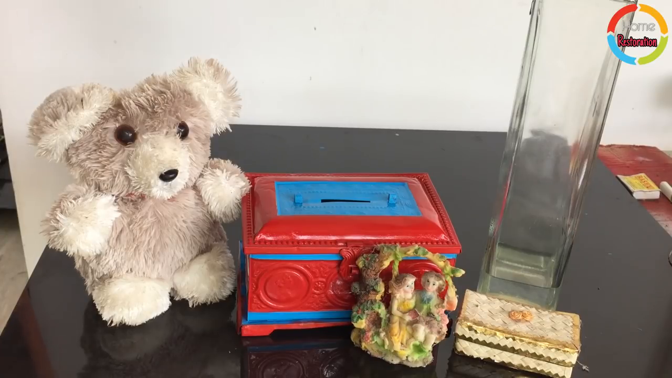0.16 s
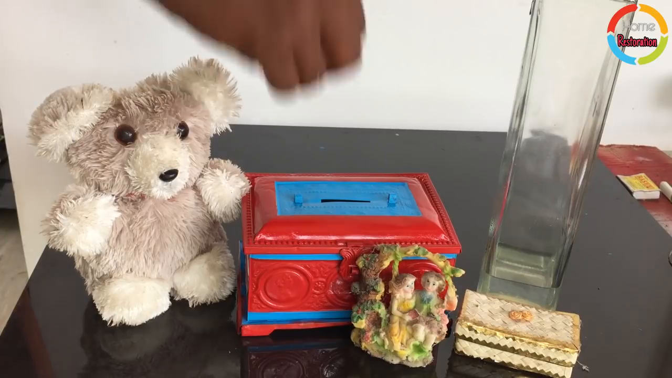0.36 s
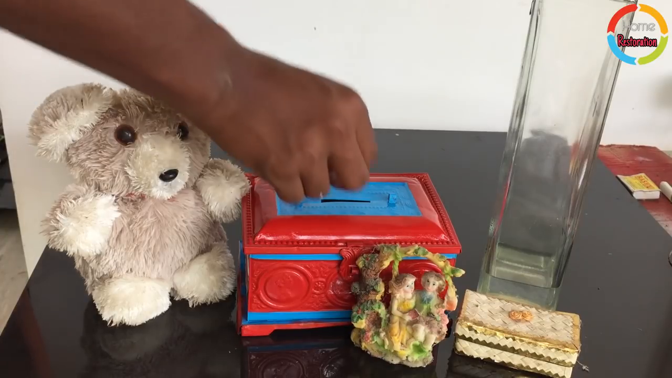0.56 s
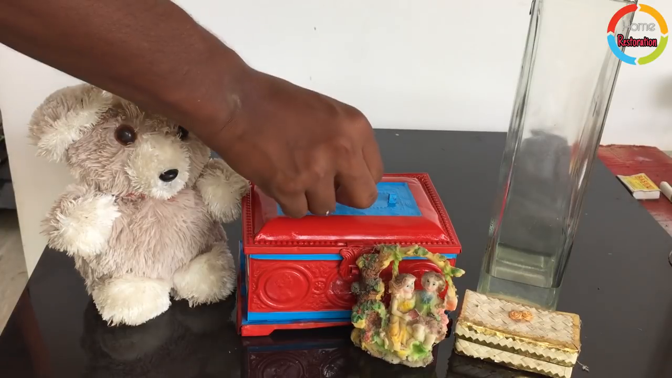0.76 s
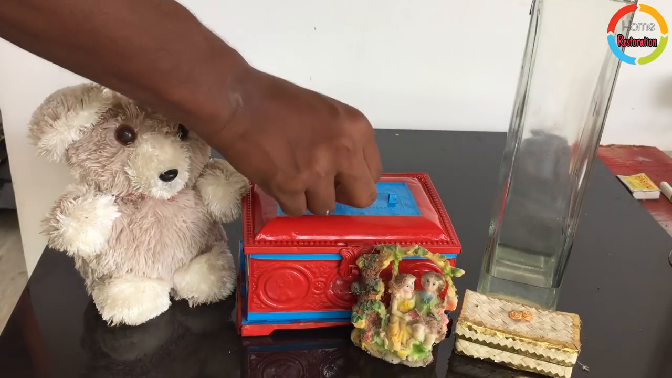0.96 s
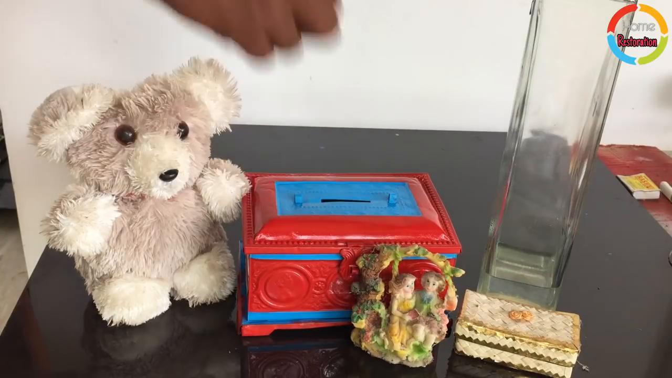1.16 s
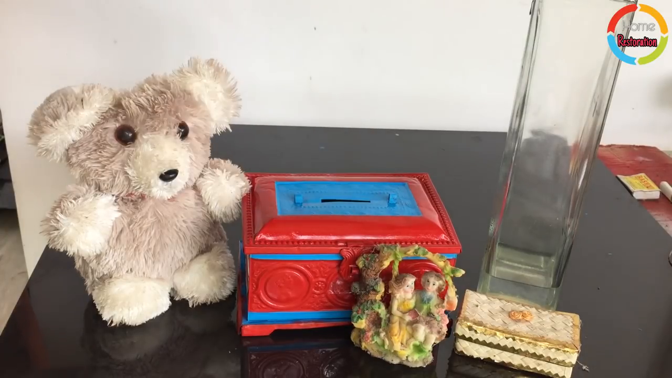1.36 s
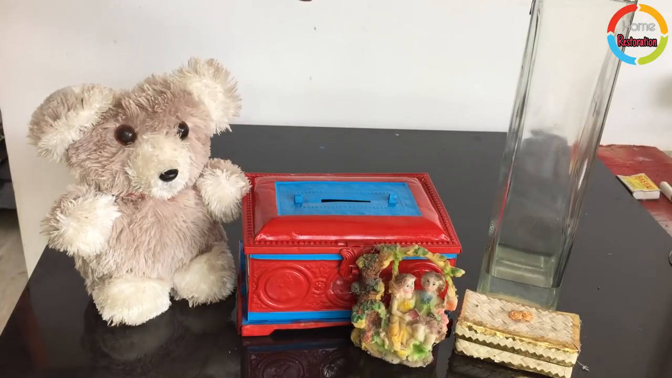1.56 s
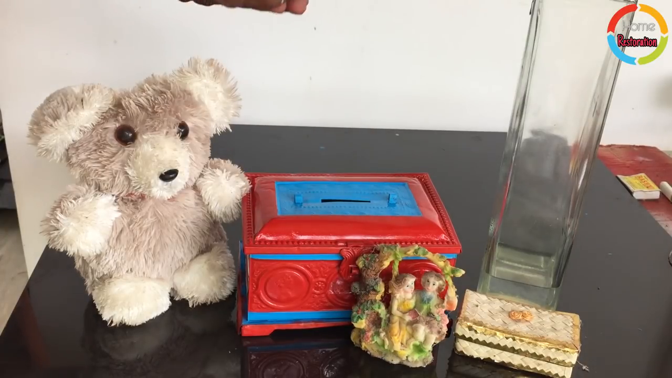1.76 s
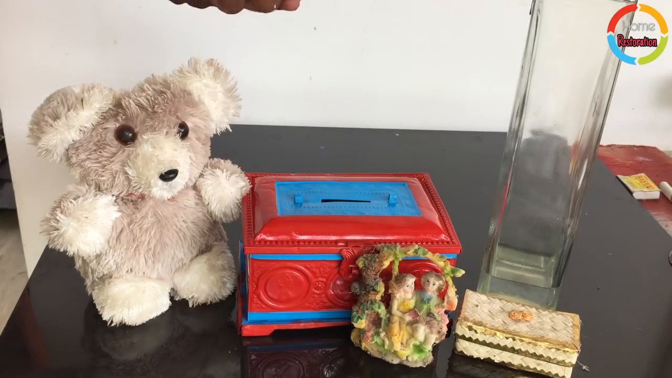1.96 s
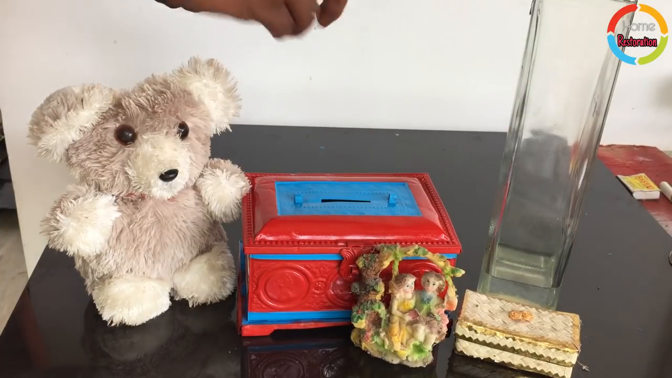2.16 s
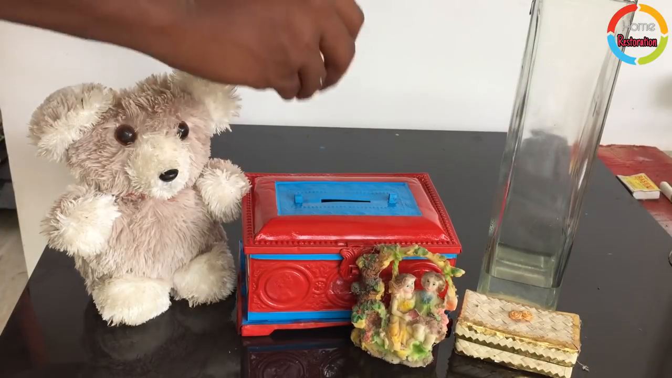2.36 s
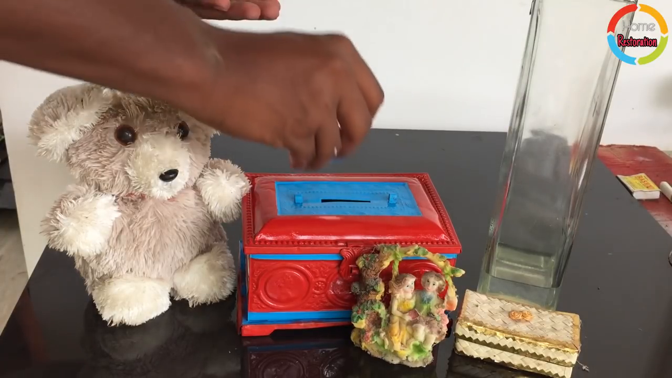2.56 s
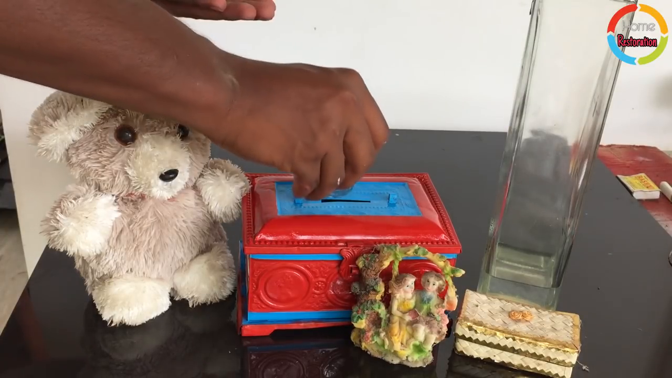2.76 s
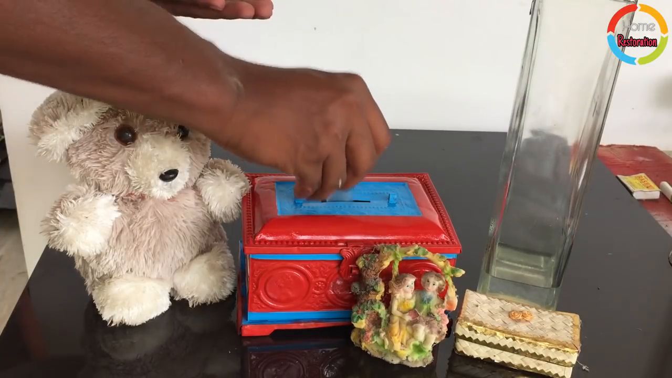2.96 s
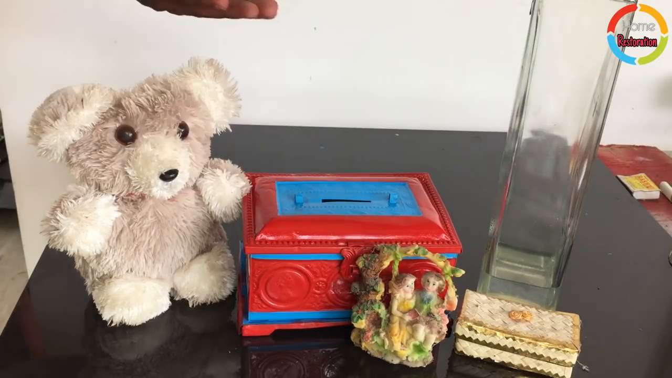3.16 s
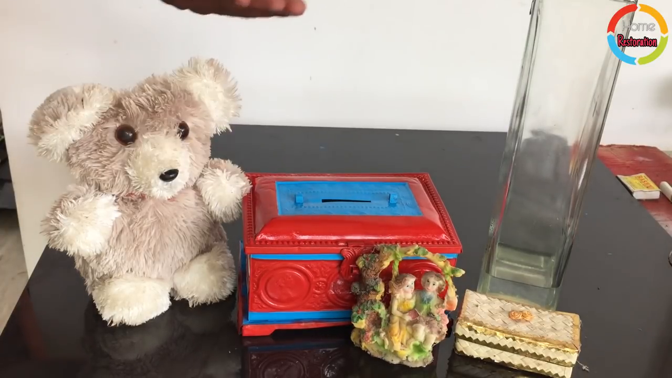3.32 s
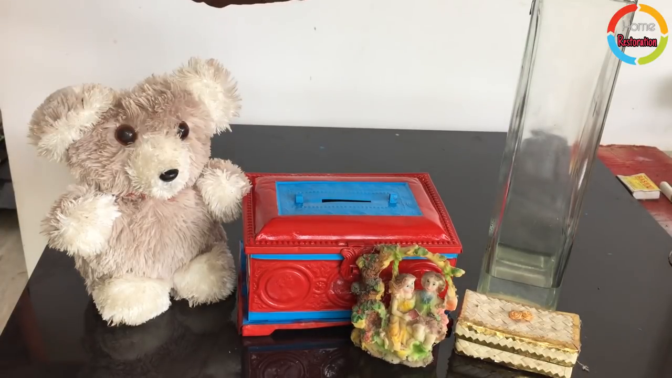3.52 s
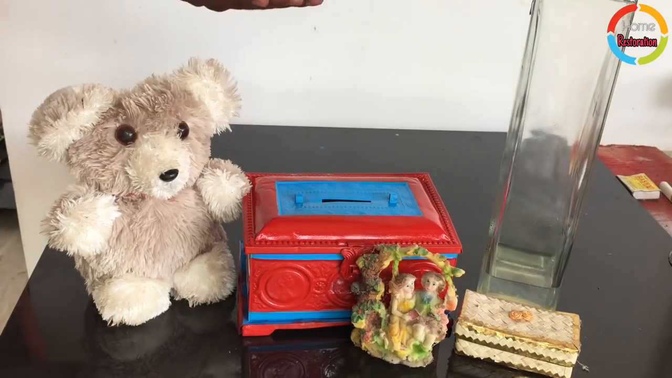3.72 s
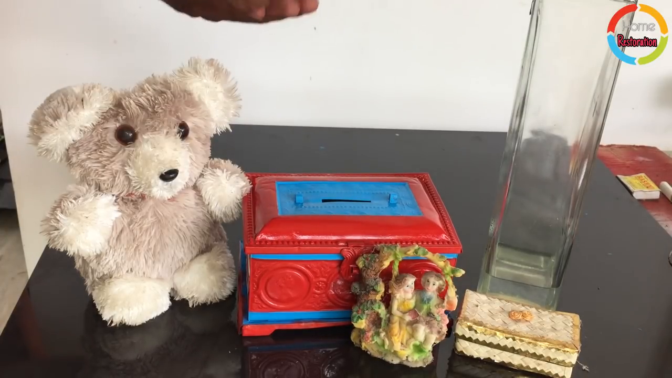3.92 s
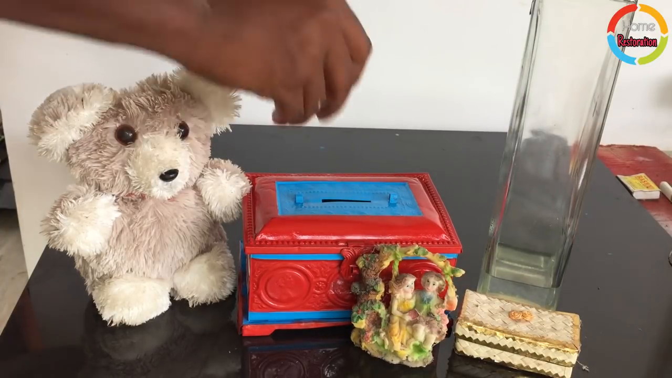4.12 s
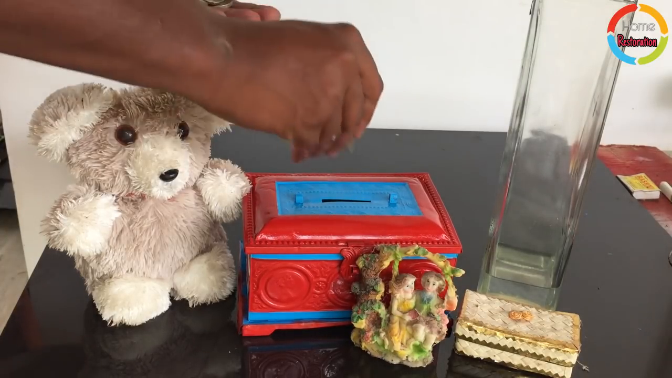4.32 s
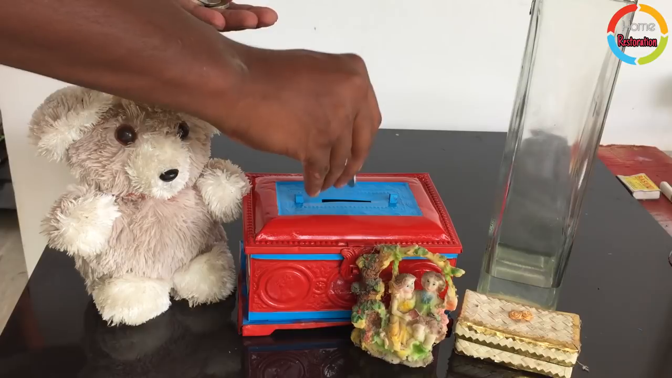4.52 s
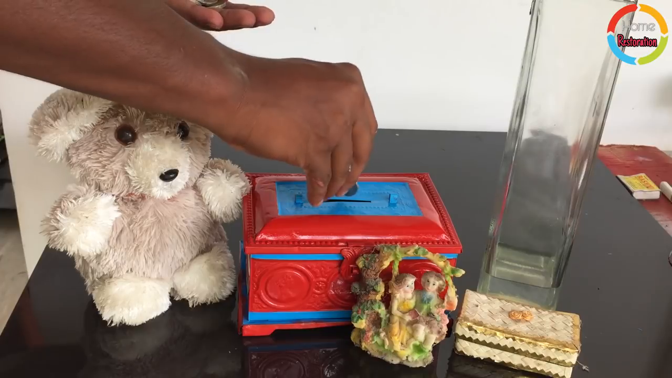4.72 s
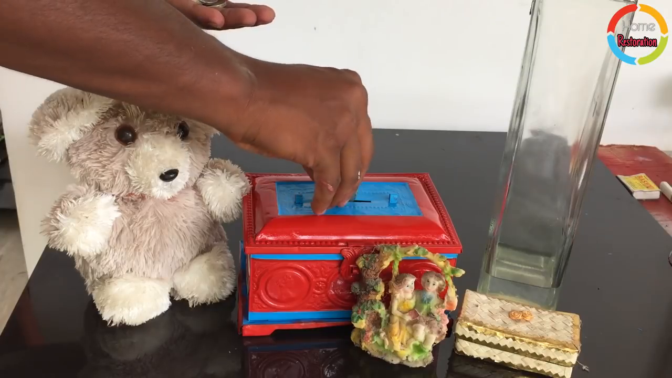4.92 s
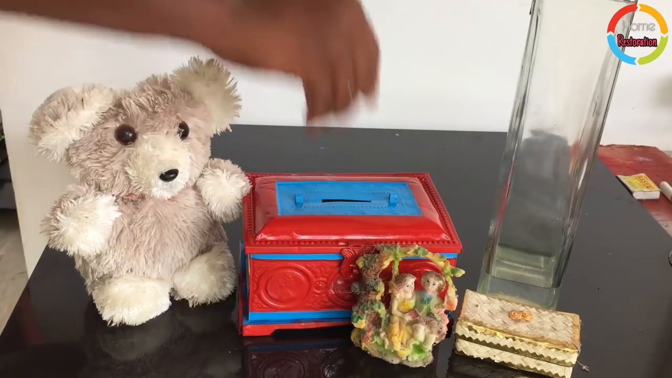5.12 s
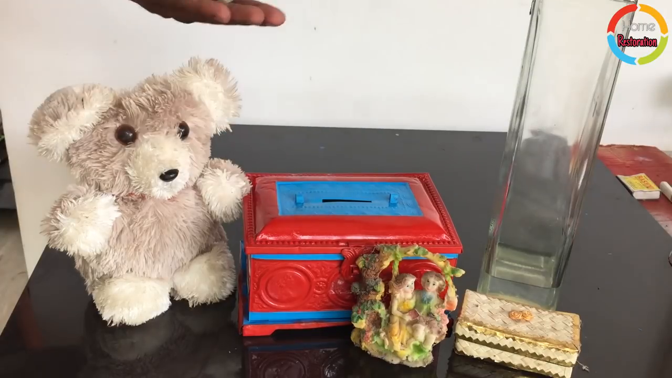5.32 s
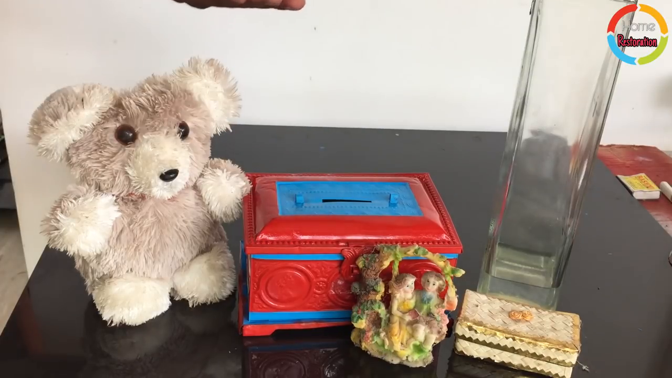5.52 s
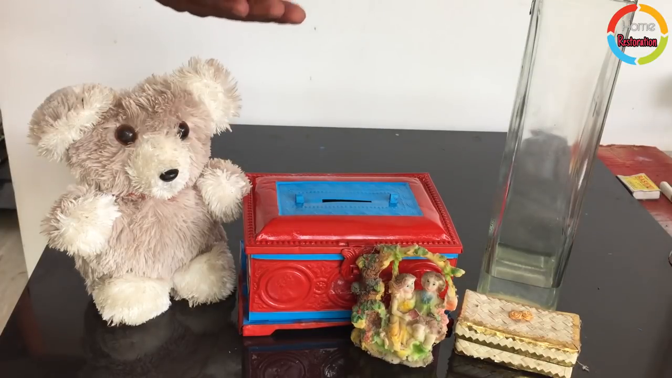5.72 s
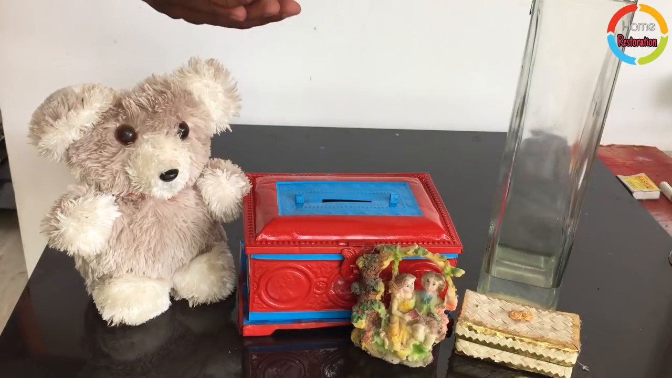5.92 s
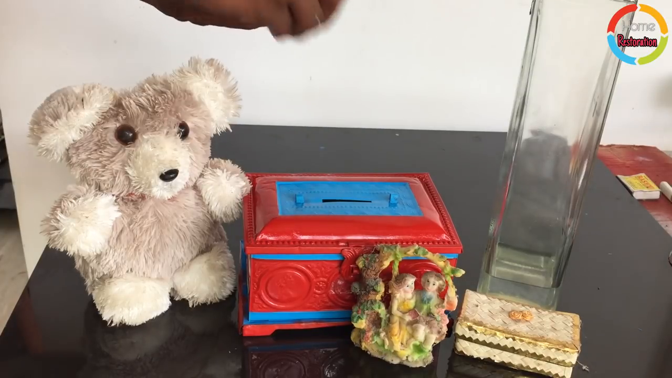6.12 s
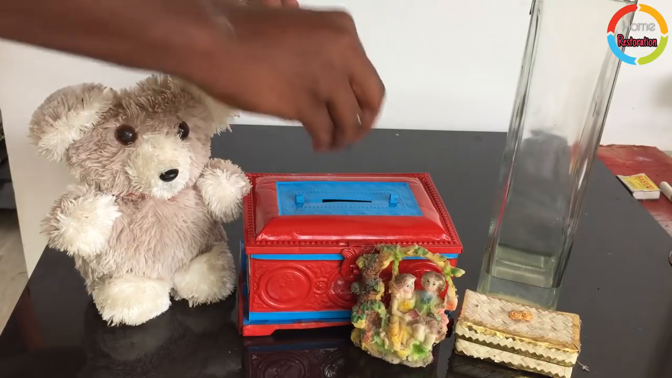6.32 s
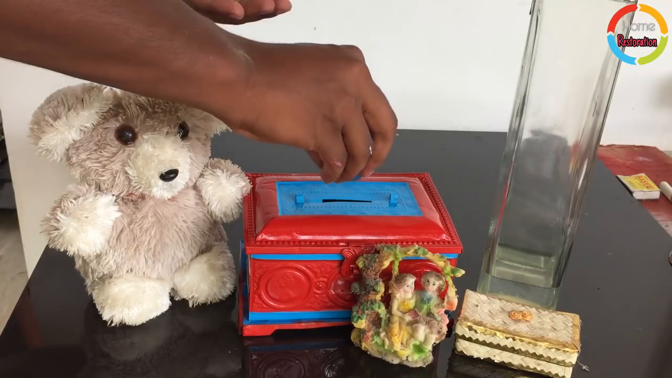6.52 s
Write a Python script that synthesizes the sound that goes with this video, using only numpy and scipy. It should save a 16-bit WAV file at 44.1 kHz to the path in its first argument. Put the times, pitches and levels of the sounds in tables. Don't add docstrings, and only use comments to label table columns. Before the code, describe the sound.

Close up, coins tick and snap brightly in a palm, then one scrapes through a thin lid slot and lands with a hard, hollow plastic clack and quick bounces. This happens three times about two seconds apart; the second and third coins wobble and roll before falling flat. Behind are quiet night insects, faint hiss and far traffic through an open window, caught by a nearby phone.

```python
import sys
import numpy as np
from scipy import signal
from scipy.fft import rfft, irfft
from scipy.io import wavfile
from scipy.ndimage import uniform_filter1d

SR = 44100
rng = np.random.default_rng(int(sys.argv[2]) if len(sys.argv) > 2 else 0)


def generate_wav(sig):
    pcm = np.round(np.clip(np.atleast_2d(sig).T, -1, 1) * 32767).astype(np.int16)
    wavfile.write(sys.argv[1], SR, pcm)


def decibels_to_gain(level_db):
    exponent = np.asarray(level_db, float) / 20
    return 10 ** exponent


N = 294588

# start in seconds, peak level in dB, bass in dB relative to the mid range.
LANDINGS = [(1.1859, -13, -4.5), (1.2918, -17, -8), (1.3801, -22, -9.5), (3.1936, -11.5, -2.5),
            (3.2291, -29.5, -4.5), (3.256, -31, -20.5), (3.3122, -22, 0), (3.3448, -18, -5.5),
            (5.2816, -13, -3), (5.3725, -19, -4.5), (5.3888, -23.5, -6)]


def level(x, db):
    return x * decibels_to_gain(db) / np.sqrt(np.mean(x ** 2))


def colour(x, table):
    table = np.array(table, float)
    hz = np.arange(len(x) // 2 + 1) * SR / len(x) + 1
    gain_db = np.interp(np.log(hz), np.log(table[:, 0]), table[:, 1])
    return irfft(rfft(x) * decibels_to_gain(gain_db), len(x))


def band(x, lo_hz, hi_hz, order=2):
    edges = [lo_hz, min(hi_hz, 0.45 * SR)]
    return signal.sosfilt(signal.butter(order, edges, "band", fs=SR, output="sos"), x)


def walk(rate, size=N):
    k = int(SR / rate)
    held = np.repeat(rng.standard_normal(size // 256 + 2)[:size // k + 1], k)
    return 1.7 * uniform_filter1d(uniform_filter1d(held, k), k)[:size]


def along(rows, t=np.arange(N) / SR):
    s, *columns = np.transpose(rows)
    return [np.interp(t, s, c) for c in columns]


def fader(rows, t):
    start, end = rows[0][0], rows[-1][0]
    return np.clip(np.minimum(t - start, end - t) / (0.18 * (end - start)), 0, 1)


def tone(hz, rows, db):
    sine = np.sin(2 * np.pi * np.cumsum(hz + np.zeros(N)) / SR)
    return np.sqrt(2) * fader(rows, np.arange(N) / SR) * decibels_to_gain(db) * sine


def grit(shape, grain_db):
    return rng.standard_normal(shape) * decibels_to_gain(grain_db * rng.exponential(size=shape))


def body(count, modes_hz, modes, wash, wash_db, tail_db, tail_s):
    t = np.arange(8192) / SR
    db, t60 = np.transpose(modes)[:, :, None]
    size = decibels_to_gain(2 * rng.standard_normal((count, len(modes))))
    phase = 2 * np.pi * rng.random((count, len(modes)))
    ring = decibels_to_gain(db - 60 * t / np.minimum(t60, 0.14))
    turn = 2 * np.pi * np.array(modes_hz)[:, None] * t
    out = size * np.cos(phase) @ (ring * np.sin(turn))
    out += size * np.sin(phase) @ (ring * np.cos(turn))
    points = np.array(wash, float)
    for f in np.geomspace(points[0, 0], points[-1, 0], num=14):
        f_db, f_t60 = (np.interp(np.log(f), np.log(points[:, 0]), points[:, k]) for k in (1, 2))
        room = decibels_to_gain(tail_db - 60 * t / tail_s * (0.78 + f / 30000))
        fade = decibels_to_gain(-60 * t / f_t60) + room
        out += decibels_to_gain(wash_db + f_db) * fade * band(rng.standard_normal(out.shape), f / 1.2, f * 1.2)
    return out


def events(s, peak_db, low_db, high_db, length, delay):
    return np.transpose(np.broadcast_arrays(s, peak_db, low_db, high_db, length, delay))


def contacts(rows, edges_hz, grain_db, blow_db, **build):
    s, peak_db, low_db, high_db, length, delay = np.transpose(rows)[:, :, None]
    t = np.arange(3072) / SR
    swell = np.exp(-((t - delay) / np.maximum(length, 1e-4)) ** 2)
    taps = grit((len(s), len(t)), grain_db) * swell
    taps /= np.sqrt(np.sum(taps ** 2, axis=1, keepdims=True))
    taps[:, 0] += decibels_to_gain(blow_db)
    sound = signal.fftconvolve(taps, body(len(s), **build), axes=1)
    mixed = 0
    for lo, hi, share_db in zip(edges_hz, edges_hz[1:], (low_db, 0, high_db)):
        part = band(sound, lo, hi, order=3)
        top = np.sqrt(uniform_filter1d(part ** 2, size=180).max(axis=1, keepdims=True))
        mixed = mixed + decibels_to_gain(peak_db + share_db) * part / top
    out = np.zeros(N + sound.shape[1])
    starts = ((s[:, 0] + 0.00056) * SR).astype(int)
    for start, hit in zip(starts, mixed):
        out[start:start + len(hit)] += hit
    return out[:N]


def drag(curves, edges_hz, grain_db, flutter, **build):
    out, spots, size = np.zeros(N), body(count=3, **build), 24576
    for rows in curves:
        sound = 0
        for spot in spots:
            rub = grit(size, grain_db) * decibels_to_gain(3.3 * walk(flutter, size))
            sound = sound + signal.fftconvolve(rub, spot)[:size]
        low, mid, high = (level(band(sound, lo, hi, order=3)[size // 6:], 0)
                          for lo, hi in zip(edges_hz, edges_hz[1:]))
        start = int(rows[0][0] * SR)
        t = (start + np.arange(len(mid))) / SR
        mid_db, low_db, high_db = along(rows, t)
        mixed = decibels_to_gain(low_db) * low + mid + decibels_to_gain(high_db) * high
        out[start:start + len(t)] += fader(rows, t) * decibels_to_gain(mid_db) * mixed
    return out


def night_air():
    # pitch in Hz, density in dB per Hz.
    air_colour = [(25, -37.5), (55, -14), (200, -2), (280, -5.5), (420, -9), (820, -9.5), (4900, -16.5),
                  (8900, -25), (12000, -25.5), (15700, -26), (16500, -38)]
    return level(colour(rng.standard_normal(N), air_colour), -68.5)


def traffic():
    # time in seconds, level in dB.
    rumble = [(0.0, -60.5), (.95, -59), (1.2, -51.5), (1.9, -54.5), (2.35, -57), (2.85, -60.5),
              (3.4, -53.5), (4.0, -60), (4.7, -61), (5.17, -56), (5.8, -60), (6.68, -58.5)]
    # start in seconds, length in seconds, first pitch in Hz, last pitch in Hz, peak level in dB.
    lorries = [
        (1.3, 1.07, 64, 76, -48),
        (4.05, 0.765, 140, 52, -51.5),
        (1.4, 0.82, 210, 184, -55.5),
    ]
    deep_db, = along(rumble)
    hum_db = -67 + 1.2 * (deep_db - deep_db.min())
    deep = decibels_to_gain(deep_db + 0.29 * walk(3.6)) * level(band(rng.standard_normal(N), 44, 92), 0)
    hum = decibels_to_gain(hum_db + 0.88 * walk(2.4)) * level(band(rng.standard_normal(N), 140, 175), 0)
    notes = 0
    for s, length, first_hz, last_hz, db in lorries:
        middle_hz = 0.4 * first_hz + 0.52 * last_hz
        rows = [(s, first_hz, db - 12), (s + 0.3 * length, middle_hz, db), (s + length, last_hz, db - 7)]
        hz, note_db = along(rows)
        notes = notes + tone(hz * (1 + 0.01268 * walk(7.5)), rows, note_db + 2.3 * walk(21))
    return decibels_to_gain(1.06) * (deep + hum) + notes


def insects():
    # pitch in Hz, width in Hz, level in dB.
    crowds = [(6790, 930, -62.5), (10130, 1000, -76.5), (8030, 540, -81)]
    # pitch in Hz, pulses a second, level in dB.
    crickets = [(5550, 71, -78), (5960, 60, -82)]
    t = np.arange(N) / SR
    out = 0
    for hz, width, db in crowds:
        hiss = band(rng.standard_normal(N), hz - width / 2, hz + width / 2)
        out = out + decibels_to_gain(1.0 * walk(8.1)) * level(hiss, db)
    for hz, rate, db in crickets:
        strength = decibels_to_gain(1.5 * walk(12))
        pulses = np.sin(np.pi * np.cumsum(rate * (1 + 0.08 * walk(8))) / SR)
        out = out + strength * level(np.sin(2 * np.pi * hz * t) * pulses, db)
    return out


def palm():
    # start in seconds, peak level in dB, dull part in dB relative to the bright.
    shifts = [(0.0164, -50, -15), (0.0235, -53, -10.5), (0.1325, -44, -26), (0.2163, -46, -3),
              (.2643, -52, -17), (0.2802, -39.5, -20), (0.2982, -46, -1), (1.5584, -55.5, 3),
              (1.7909, -57, 7), (1.8551, -50, -15), (1.8657, -58, -10), (1.9774, -51, 5),
              (1.9859, -34.5, -7.5), (2.0021, -38, -24), (2.0348, -51, -11), (2.0454, -48, -13.5),
              (3.7115, -40, -21), (3.7648, -60.5, -2), (3.9505, -45.5, -0.5), (3.9759, -43, -4),
              (4.0441, -48, -10), (5.716, -41, -23), (5.7305, -36, -7.5), (5.9315, -42.5, -6.5),
              (5.9534, -43, -12.5), (5.9644, -42.5, 1), (5.9716, -37, -2), (6.0015, -37, -11),
              (6.008, -47, -25), (6.0164, -44, -13)]
    # peak time in seconds, rise in seconds,
    # fall in seconds, level in dB, top ring of the handful in dB relative to the bright part.
    rustle = [(0.018, .03, 0.055, -43.5, -2), (.14, .012, 0.061, -55, -3), (0.196, 0.066, 0.042, -45, 0),
              (.225, 0.01, 0.1, -49, -3), (0.268, .01, .03, -48, -3), (.295, 0.042, 0.067, -46, 0),
              (1.518, .06, .08, -61, -4), (1.8, 0.032, 0.098, -54.5, -8), (1.865, 0.043, .035, -53.5, -21),
              (2.0, .04, 0.04, -48.5, 3.5), (2.038, 0.022, 0.053, -46.5, -2), (3.712, 0.013, 0.1, -51, 2),
              (3.978, .05, 0.061, -44, -3.5), (5.732, 0.027, 0.048, -45, 1), (5.975, .03, .06, -40, -8.5),
              (6.012, 0.038, .05, -54, -6)]
    coins_hz = [1850, 2730, 4600, 5340, 6200, 8400, 9200, 9650, 11300, 13300, 14300, 14460, 14700, 14920,
                15150, 15380, 15650]
    # level in dB, 60 dB decay in seconds.
    coins = [(-9.5, .02), (-16, .02), (-1, .02), (9, 0.039), (-21, 0.022), (4, 0.026), (14.5, 0.011),
             (17, .025), (-21, .02), (-6, .02), (-3, .08), (-3, 0.09), (-24, 0.031), (-1, 0.059),
             (-8, 0.036), (-19, .05), (-5.5, 0.037)]
    # pitch in Hz, density in dB per Hz, 60 dB decay in seconds.
    skin = [(940, 2, 0.028), (2450, 3, 0.03), (5300, 12, 0.016), (9030, 20.5, 0.0072), (12300, -24, 0.0092),
            (13500, -6, .016), (15100, -10, .05)]
    hand = dict(modes_hz=coins_hz, modes=coins, wash=skin, wash_db=3.5, tail_db=-8, tail_s=0.17)
    edges_hz = (1500, 6500, 12500, 19000)
    s, db, dull_db = np.transpose(shifts)
    stroke_s, *_, top_db = np.transpose(rustle)
    tick_top_db = np.interp(s, stroke_s, top_db) - 5
    ticks = events(s, db, dull_db, tick_top_db, 0.0015, 0.0003)
    range_db, stroke_dull_db = 27, -7
    strokes = []
    for s, rise, fall, db, top in rustle:
        strokes.append([(max(s + ds, 0), db - range_db * (ds != 0), stroke_dull_db, top)
                        for ds in (-rise, 0, fall)])
    ticking = decibels_to_gain(-4.0) * contacts(ticks, edges_hz, 8.4, -0.23, **hand)
    return ticking + decibels_to_gain(-1.5) * drag(strokes, edges_hz, 3.4, 86.1, **hand)


def snaps():
    # start in seconds, peak level in dB, pitch in Hz.
    edge_snaps = [(0.0182, -28, 15300), (0.1331, -37, 14600), (0.2174, -35, 14500), (0.2809, -33, 14500),
                  (1.986, -17, 14300), (2.0346, -18.5, 14460), (3.7121, -24, 14900), (3.9769, -35, 14460),
                  (5.9544, -28, 9050), (6.002, -23, 9450), (6.0097, -20.5, 9450)]
    out, t = np.zeros(N), np.arange(256) / SR
    cracks = rng.standard_normal((len(edge_snaps), len(t)))
    for (s, peak_db, hz), crack in zip(edge_snaps, cracks):
        click = np.exp(-t / 0.00025) * np.sin(2 * np.pi * hz * t)
        click += 0.27 * np.exp(-t / 0.00088) * np.gradient(crack)
        out[int(s * SR):int(s * SR) + len(t)] += decibels_to_gain(peak_db - 3.0) * click
    return band(out, 6000, 18000)


def slot():
    # start in seconds, peak level in dB,
    # softness as bass in dB relative to the mid range, chatter length in seconds.
    slot_touches = [(0.919, -53, 11, 0.013), (0.949, -69, 20, 0.0082), (0.992, -56, 12, .013),
                    (1.107, -45.5, -1.5, 0.013), (1.166, -58, -5.5, .008), (3.0134, -54.5, 18.5, .017),
                    (3.04, -46.5, 6.5, 0.013), (3.08, -40, -1, 0.016), (3.1213, -30.5, -9, 0.014),
                    (4.994, -50, 11.5, 0.0047), (5.046, -64, 2, 0.012), (5.101, -51.5, -7, 0.007),
                    (5.123, -44.5, 0.5, 0.02)]
    # start in seconds, length in seconds, level at start in dB, level at end in dB.
    slides = [
        (0.919, .15, -55, -60),
        (3.017, 0.1, -63.5, -48),
        (4.999, 0.165, -50, -74),
    ]
    lid_hz = [312, 560, 790, 885, 1290, 1500, 1810, 1990, 2240, 2830, 3280, 3470, 4470]
    # level in dB, 60 dB decay in seconds.
    lid_ring = [(2.5, .09), (5, .05), (4.5, .04), (4, 0.066), (-5, 0.079), (-11.5, 0.12), (-6, 0.061),
                (-11, 0.0704), (-12, .08), (-12.5, .07), (-13.5, 0.076), (-13.5, 0.053), (-20, 0.044)]
    # pitch in Hz, density in dB per Hz, 60 dB decay in seconds.
    lid_wash = [(236, -20.5, 0.071), (307, 1.5, 0.065), (557, -2.5, 0.24), (850, -1, 0.048),
                (1149, -17.5, 0.052), (1300, -7, 0.056), (1600, -18.5, 0.069), (2140, -8, .06),
                (3100, -15, .05), (3900, -30.5, 0.02), (6005, -29.5, .04)]
    lid = dict(modes_hz=lid_hz, modes=lid_ring, wash=lid_wash, wash_db=12.5, tail_db=-20, tail_s=0.35)
    edges_hz = (240, 1100, 5000, 19000)
    s, db, soft_db, length = np.transpose(slot_touches)
    treble_db = np.maximum(-25 - soft_db, -29.5)
    touches = events(s, db, soft_db, treble_db, length, 0.1 * length)
    shares_db = 10.5, -30
    pushes = [[(s, db, *shares_db), (s + length, end_db, *shares_db)] for s, length, db, end_db in slides]
    chatter = contacts(touches, edges_hz, 4.0, -2, **lid)
    return chatter + decibels_to_gain(-0.5) * drag(pushes, edges_hz, 4.2, 43.9, **lid)


def walls():
    walls_hz = [295, 340, 405, 463, 545, 587, 670, 795, 870, 958, 1018, 1265, 1357, 1491, 1809, 2025, 2110,
                2207, 2340, 2428, 2830, 3035, 3270, 3456, 3620, 3880, 4185, 4340, 4456, 5500]
    # level in dB, 60 dB decay in seconds.
    walls_ring = [(2, 0.27), (-18.5, 0.061), (-9.5, 0.13), (2, 0.064), (5.5, 0.36), (8.5, 0.42),
                  (-11.5, 0.058), (3, 0.092), (-4, 0.27), (-5, 0.23), (-10.5, 0.22), (-11, 0.3), (-4, 0.12),
                  (-10, 0.21), (-9, 0.086), (-11, 0.16), (-11, 0.3), (-8.5, 0.099), (-8, 0.24), (-9, 0.15),
                  (-17, 0.062), (-7, 0.075), (-18.5, 0.16), (-10, .12), (-17.5, 0.14), (-12, 0.049),
                  (-11.5, 0.07), (-21.5, 0.09), (-11.5, .09), (-22, 0.11)]
    # pitch in Hz, density in dB per Hz, 60 dB decay in seconds.
    walls_wash = [(142.3, -21.5, 0.23), (285.2, 12.5, 0.059), (650, 9, 0.22), (1016, -12.5, 0.12),
                  (2280, -3.5, 0.12), (4160, -12.5, 0.1), (6660, -14.5, 0.073), (10300, -23, 0.086),
                  (14800, -29, 0.11)]
    return dict(modes_hz=walls_hz, modes=walls_ring, wash=walls_wash, wash_db=15.5, tail_db=-23.5, tail_s=0.31)


def landings():
    treble_db, chatter_s, swell_s = -5.5, 0.0055, 0.00045
    blows = events(*np.transpose(LANDINGS), treble_db, chatter_s, swell_s)
    return contacts(blows, (225, 1000, 5000, 19000), 4.0, 3, **walls())


def thuds():
    out, t = np.zeros(N), np.arange(2048) / SR
    push = np.exp(-t / 0.016) * np.sin(2 * np.pi * 148 * t)
    for s, db, _ in LANDINGS:
        out[int(s * SR):int(s * SR) + len(t)] += decibels_to_gain(db - 28.5) * push
    return out


def rolling():
    # start in seconds, peak level in dB, chatter length in seconds.
    wobbles = [(3.4209, -28.5, 0.018), (3.481, -28, 0.013), (3.5294, -29, 0.025), (3.5774, -27, 0.018),
               (3.6193, -27.5, 0.015), (3.6401, -32, 0.0094), (3.661, -38, 0.006), (5.1619, -30.5, 0.021),
               (5.1832, -30.5, 0.007), (5.331, -20.5, .009), (5.45, -33, 0.012), (5.5124, -33.5, 0.0067),
               (5.569, -27.5, 0.0072), (5.6135, -27, 0.013), (5.6494, -29, 0.0067), (5.668, -38, 0.01085)]
    # start in seconds, time it keeps rolling in seconds,
    # level at start in dB, level as it falls flat in dB.
    trundles = [
        (1.4, 0.036, -42, -47),
        (3.33, 0.14, -35.5, -38.5),
        (5.389, .19, -40.5, -44.5),
    ]
    s, db, length = np.transpose(wobbles)
    knocks = events(s, db, -3.5, -10, length, 0.46 * length)
    settle_s, settle_db = 0.16, -29
    shares_db = 0, -18
    runs = []
    for s, length, db, end_db in trundles:
        flat_s = s + length
        runs.append([(s, db, *shares_db), (flat_s, end_db, *shares_db),
                     (flat_s + settle_s, end_db + settle_db, *shares_db)])
    knocking = contacts(knocks, (265, 1000, 5000, 19000), 5.1, -5.5, **walls())
    return knocking + drag(runs, (270, 1000, 5000, 19000), 3.35, 50, **walls())


def singing_coin():
    # pitch in Hz, level in dB.
    sing_pair = [(14303, -35), (14460, -35)]
    rise_s, hold_s, fall_s = 0.045, 0.045, 0.03
    s = 5.285 + np.cumsum([0, rise_s, hold_s, fall_s])
    sing = np.transpose([s, -38.5 + np.array([-11.5, 0, -3, -18])])
    sing_db = along(sing)[0] - 3.5
    return sum(tone(hz, sing, sing_db + db - sing_pair[0][1]) for hz, db in sing_pair)


def scene():
    window = night_air() + traffic() + insects()
    hand = palm() + snaps() + singing_coin()
    box = slot() + landings() + thuds() + rolling()
    return (window + hand + box)[None]


def band_limit(x):
    return signal.sosfilt(signal.butter(12, 16880, fs=SR, output="sos"), x)


def record(dry):
    rounded = np.tanh(0.62 * dry) / 0.62
    no_bass = signal.sosfilt(signal.butter(2, 45, "high", fs=SR, output="sos"), rounded)
    mix = signal.sosfilt(signal.ellip(6, 0.3, 26, 15900, fs=SR, output="sos"), no_bass)
    return band_limit(mix)


dry = scene()
out = record(dry)
generate_wav(out)
```